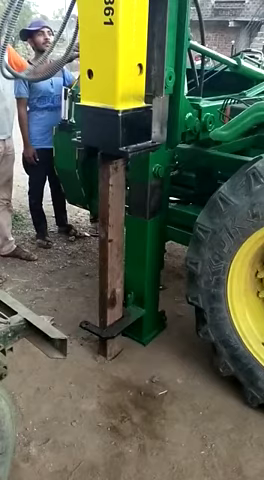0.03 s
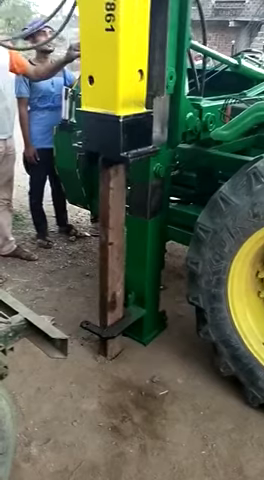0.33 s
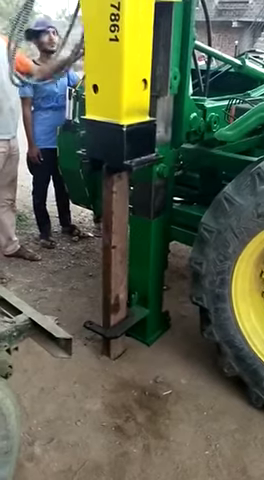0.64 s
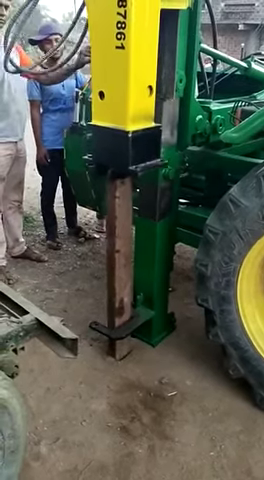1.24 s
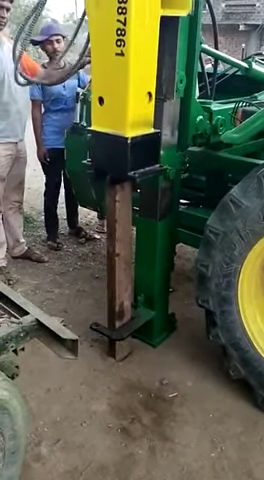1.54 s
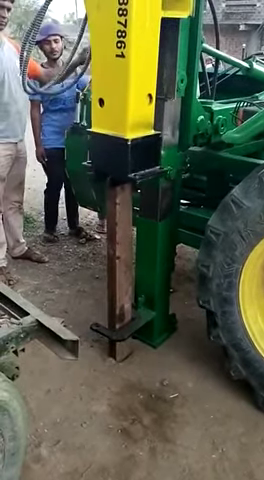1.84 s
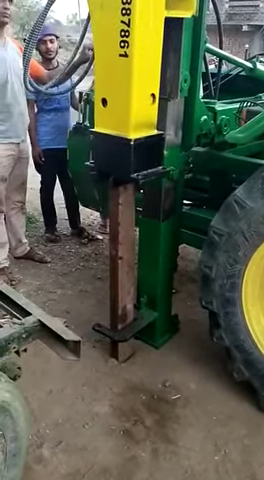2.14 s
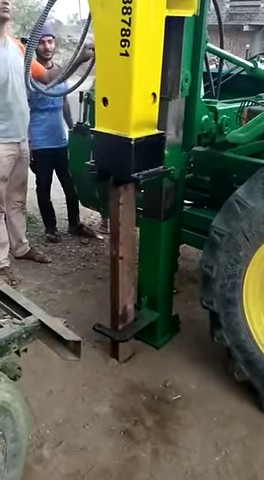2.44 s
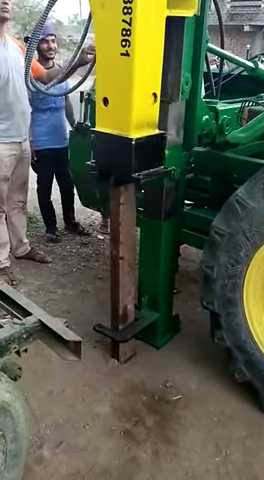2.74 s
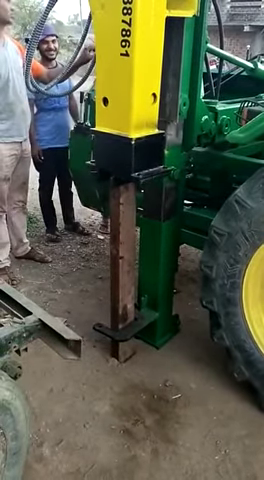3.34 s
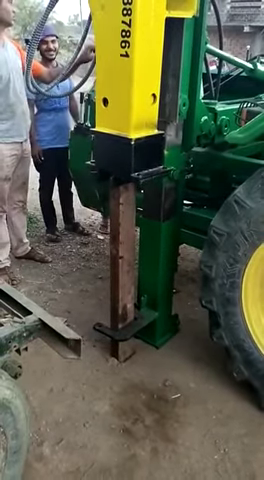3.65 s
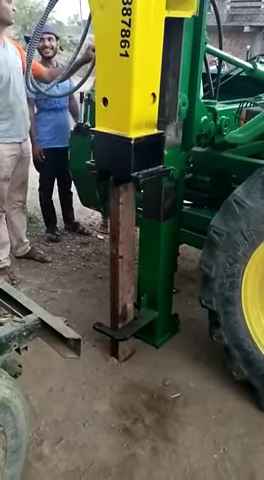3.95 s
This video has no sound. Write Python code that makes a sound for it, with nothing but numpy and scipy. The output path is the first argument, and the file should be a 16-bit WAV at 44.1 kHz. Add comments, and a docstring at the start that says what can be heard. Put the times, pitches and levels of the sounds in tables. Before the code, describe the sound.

A hydraulic hammer clangs on a steel post outdoors, cutting in mid-ring at 0.4 seconds and striking at 0.5. After a pause, four quick ringing blows land between 1.1 and 1.7 seconds, each followed by a metallic rattle. A quieter diesel tractor rumbles underneath and continues until 4 seconds, with a short hydraulic hiss and clatter near 2.6 seconds, then light knocking.

```python
"""An open yard, where a tractor-mounted hydraulic hammer drives a steel post: a short burst, a pause,
four more blows. Each impact gives a broadband crack and excites the post's damped modes; the hammer then
rattles back onto it. The three-cylinder diesel runs throughout, sounding harmonics of its shaft rate and
knocking and hissing more when the hydraulics load it. A limiter lowers the gain at every blow."""
import sys
import numpy as np
from scipy import signal
from scipy.fft import rfft, irfft
from scipy.io import wavfile
from scipy.ndimage import uniform_filter1d, minimum_filter1d

SR = 44100
rng = np.random.default_rng(int(sys.argv[2]) if len(sys.argv) > 2 else 0)


def int16_out(signal):
    """Quantize to a 16-bit WAV file."""
    q = np.round(np.clip(np.atleast_2d(signal).T, -1, 1) * 32767)
    wavfile.write(sys.argv[1], SR, q.astype(np.int16))


N = 176400
T = np.arange(N) / SR

# Left-right coherence (f/Hz, correlation) and balance (f/Hz, left minus right/dB)
COHERENCE = [(100, 0.63), (250, 1.05), (500, 0.72), (1000, 0.46), (2000, 0.1), (4000, -0.31), (12000, 0.2)]
BALANCE = [(110, -1), (380, 4), (700, -2.5), (1290, 6.5), (2380, -1), (4400, 3), (8100, 6.5), (15000, -2)]

# Engine firing rate (t/s, f/Hz)
FIRING_RATE = [(.6, 32.6), (1.1, 32.6), (1.9, 34.3), (2.5, 34.0), (2.9, 33.2), (3.1, 32.3), (3.35, 32.6),
               (3.6, 34.3), (4, 34.2)]
# Engine in the pause, as the valve closes, and after (t/s, exhaust/dB, knock/dB, oil/dB, treble/dB)
ENGINE_PAUSE = [(0.8, -29.5, -24.5, -32, -55.5), (1.1, -32.5, -36, -31.5, -50.5)]
ENGINE_EASED = [(1.95, -32, -30, -45.5, -58)]
ENGINE_AFTER = [(2.101, -32, -39, -47.5, -59.5), (2.268, -32.5, -37.5, -48.5, -60),
                (2.586, -31, -36, -42.5, -52), (2.65, -30, -27, -37, -52), (2.72, -29.5, -33.5, -37.5, -48),
                (2.872, -30, -28, -40, -47.5), (3.026, -29.5, -24.5, -39, -52.5),
                (3.412, -32, -26, -37.5, -50), (3.67, -33, -34.5, -41.5, -50),
                (3.84, -32.5, -31.5, -41.5, -49.5), (4.0, -33, -54, -42.5, -48.5)]
# Exhaust harmonics (multiple of the shaft rate, level/dB)
EXHAUST_ORDERS = [(1, -40), (2, -32), (3, -15), (4, -56), (5, -9.5), (6, 0.5), (7, -6.5), (8, -5.5),
                  (9, -7), (10, -14.5), (11, -13.5), (12, -13), (13, -23.5), (15, -11.5)]
# Envelopes of the exhaust's deep bass and the loaded pump's hum (t/s, level/dB)
BASS_GAIN = [(.4, 1), (2.0, -1), (3.0, 1.5), (3.4, 2.5), (3.6, -8), (4, -12)]
PUMP_LEVEL = [(2.5, -56), (3.1, -35.5), (3.45, -35), (3.56, -60)]
# Relative spectral densities of the exhaust and oil noises (f/Hz, level/dB)
RUMBLE_SPECTRUM = [(20, -24), (50, -12), (85, -12), (120, 4), (180, 2.5), (260, 0), (340, -7), (450, -40),
                   (800, -54.5)]
HISS_SPECTRUM = [(200, -11.5), (450, 6), (640, 3), (830, 7), (1100, 5), (1800, 5), (2150, -2), (2550, -1.5),
                 (3000, -4), (4000, -9), (5200, -17.5), (9000, -86)]
GRIT_SPECTRUM = [(1200, -22), (2200, 4), (2600, -4), (3200, 2), (3700, -0.5), (4400, -22), (6000, -13),
                 (10000, -54)]
TREBLE_SPECTRUM = [(2500, -27), (4500, 0.5), (6000, 0.5), (8000, 4), (9800, -6), (11500, -12.5),
                   (15000, -22)]
VALVE_SPECTRUM = [(300, -25), (800, -2), (1400, 6), (3200, 0), (4500, -11), (6000, -31), (10000, -55)]
# Engine block resonances, one list per column (f/Hz, bandwidth/Hz, level/dB)
BLOCK_HZ = [830, 1390, 1562, 2400, 2580, 2890]
BLOCK_WIDTH_HZ = [82, 74, 79, 70, 89.5, 80]
BLOCK_DB = [-9.5, -3, -2.5, -10.5, -13, -28]
# Knock of each cylinder (level/dB, f/Hz, rise/s)
CYLINDERS = [(1.5, 1562, 0.0065), (-0.5, 1390, 0.0031), (0, 1390, .004)]
# A loose part striking the block (t/s, level/dB, f/Hz)
CLANKS = [(0.854, -20, 1390), (.882, -20, 1380), (2.674, -24, 1460), (2.972, -27, 1500),
          (3.129, -21.5, 1490), (3.22, -20, 1390), (3.314, -19.5, 1500), (3.405, -24, 1440),
          (3.761, -23.5, 1450), (3.854, -26, 1390)]
# Impacts in the valve linkage (t/s, level/dB)
LINKAGE_HITS = [(2.623, -33), (2.641, -25.5), (2.650, -26), (2.673, -32), (2.707, -34)]

# Modes of the post, one list per column (f/Hz, level/dB, T60/s)
POST_HZ = [376, 528, 577, 737, 821, 1324, 2103, 2381, 2448, 2815, 4803, 4880, 5195, 6202, 6471, 6735, 6982,
           7405, 8570, 9383, 10600, 11180, 11480, 14500, 15150]
POST_DB = [-4, 0, -7, -2.5, 0, -1.5, -2.5, 0, 3.5, -10, -8, -14, -12, -25, -6, -11, -13.5, -5, -12, -23,
           -36, -29, -33, -31, -37]
POST_T60 = [0.42, 0.42, 0.38, 0.38, 0.28, 0.27, 0.32, 0.38, 0.38, 0.33, 0.55, .5, 0.45, 1.25, 0.5, 0.41,
            0.36, 0.33, 0.32, 0.68, .22, .35, .22, .42, .33]
# Its two least damped, singing modes (f/Hz)
SINGING_HZ = [6202, 9383]
# Relative spectral densities of the struck post and housing (f/Hz, level/dB)
CLANG_SPECTRUM = [(100, -30), (350, -4.5), (600, -12.5), (1300, 1), (1750, -3), (2300, 2), (3000, -1.5),
                  (4300, -9), (5800, -14), (7300, -11.5), (9100, -15.5), (9900, -40), (11200, -23),
                  (15000, -32)]
RATTLE_SPECTRUM = [(100, -54), (300, -1.5), (550, 5.5), (900, 5), (1400, 4.5), (1800, 1.5), (2400, 0.5),
                   (3500, -10), (7000, -14), (9000, -53), (10000, -66), (15000, -67)]
THUD_SPECTRUM = [(150, -26), (340, -0.5), (450, -11), (560, 1), (780, -4), (1100, -17), (3000, -50),
                 (10000, -80)]
CRACK_SPECTRUM = [(100, -18), (350, -1), (800, -3), (1300, 7), (1700, 1.5), (2100, 4.5), (2800, -12),
                  (4400, -7.5), (5000, -13), (6000, -36), (9000, -46), (15000, -47)]
# Decay of the dense modes (f/Hz, T60/s)
CLANG_T60 = [(200, 0.39), (1000, 0.6), (2500, 0.27), (5000, 0.4), (9000, 0.31), (10500, 0.19), (14000, 0.2)]
# The hammer settling on the post (t/s, level/dB, duration/s, relative thud level/dB)
RATTLES = [(0.396, 0.5, 0.043, -11), (0.58, 1.5, 0.054, -11.5), (1.227, 3.5, 0.012, 0),
           (1.246, -3, 0.067, -10), (1.399, 0, 0.041, -5.5), (1.55, 2, 0.049, -2.5),
           (1.726, 0.5, 0.056, -9)]
# Blows (t/s, level/dB, singing-mode gain/dB); the first is heard only by its decay
BLOWS = [(0.321, 0, 0), (0.4826, -2.5, -20), (1.137, -6.5, -6), (1.2977, -5.5, -3), (1.461, -5, 6),
         (1.6292, -5, 8)]

IMPACT_RISE_S, MODE_SPREAD_DB = .0018, 2.5


def amp(db):
    """Amplitude ratio of a level in decibels."""
    return 10 ** (np.asarray(db) / 20)


def unit(x):
    """Normalisation to unit rms."""
    return x / np.sqrt(np.mean(x ** 2) + 1e-20)


def read(points, hz):
    """Interpolation on a logarithmic frequency axis."""
    f, value = np.transpose(points)
    return np.interp(np.log(hz + 1), np.log(f + 1), value)


def add(mix, s, sound):
    """Superposition of a stereo sound starting at time s."""
    part = mix[:, max(round(s * SR), 0):][:, :sound.shape[1]]
    part += sound[:, :part.shape[1]]


def noise(spectrum, size=N, coherence=None):
    """Spectrally shaped Gaussian noise, partially coherent between the channels."""
    hz = np.fft.rfftfreq(size, 1 / SR)
    a, b = rfft(rng.standard_normal((2, size)))
    c = np.clip(read(COHERENCE, hz) if coherence is None else coherence, -1, 1)
    gain = spectrum(hz) if callable(spectrum) else amp(read(spectrum, hz))
    return unit(irfft(np.array([a, c * a + np.sqrt(1 - c ** 2) * b]) * gain, size))


def wander(bandwidth_hz):
    """Low-pass random modulation of unit rms."""
    hz = np.fft.rfftfreq(N, 1 / SR)
    return unit(irfft(rfft(rng.standard_normal(N)) * np.exp(-(hz / bandwidth_hz) ** 2), N))


def phases(hz, likeness=6):
    """Random modal phases in cycles; the channels diverge as coherence falls."""
    count = np.size(hz)
    return rng.random(count) + rng.standard_normal((2, count)) * (1 - read(COHERENCE, hz)) / likeness


def exhaust(firings, shaft, gain):
    """Periodic gas pulses: shaft harmonics and rumble, amplitude-modulated at the firing rate."""
    throb = np.cos(2 * np.pi * (firings - .57))  # peaks .57 of a period after each firing
    tones = sum(amp(db + wander(17)) * np.sin(2 * np.pi * (order * shaft + rng.random()))
                for order, db in EXHAUST_ORDERS)
    rumble = noise(RUMBLE_SPECTRUM) * (1 + .38 * throb)
    out = gain * (amp(-2.5) * unit(tones * (1 + .14 * throb)) + amp(-4.5) * unit(rumble))
    bass = signal.sosfiltfilt(signal.butter(6, 142, fs=SR, output="sos"), out, padtype="even")
    return out + bass * (amp(np.interp(T, *np.transpose(BASS_GAIN))) - 1)


def block_response(hz):
    """Resonance of the engine block: a sum of Lorentzian peaks."""
    return sum(amp(db) / (1 + (2 * (hz - centre) / width) ** 2)
               for centre, width, db in zip(BLOCK_HZ, BLOCK_WIDTH_HZ, BLOCK_DB))


def hydraulics(shaft, oil_gain, treble_gain):
    """Flow noise: oil under pressure hisses and crackles over the pump's hum at shaft order 12."""
    hum = amp(np.interp(T, *np.transpose(PUMP_LEVEL))) * np.sin(2 * np.pi * 12 * shaft)
    flow = unit(amp(wander(40)))
    hiss = amp(5) * noise(HISS_SPECTRUM) + noise(block_response)
    grit = amp(-5.5) * unit(noise(GRIT_SPECTRUM) * amp(4.5 * wander(220)))
    treble = amp(-1.5) * noise(TREBLE_SPECTRUM)
    return hum + oil_gain * (flow * hiss + grit) + treble_gain * flow * treble


def knock(focus_hz, rise_s):
    """Impact response of the block: damped modes, favoured within 170 Hz of the focus."""
    t, hz = T[:SR // 10], np.array(BLOCK_HZ)
    away = np.minimum(abs(hz - focus_hz) / 170, 1)
    levels = amp(np.array(BLOCK_DB) - 7 * away + MODE_SPREAD_DB * rng.standard_normal(len(hz)))
    pitches = hz + 22.2 * rng.standard_normal(len(hz))
    modes = np.sin(2 * np.pi * (pitches[:, None] * t + phases(hz)[:, :, None]))
    envelope = t / rise_s * np.exp(1 - t / rise_s)
    return (levels / np.linalg.norm(levels)) @ modes * envelope


def diesel_knock(firings, gain):
    """Impulsive excitation of the block by each firing and, now and then, by a loose part."""
    out, count = np.zeros((2, N)), np.floor(firings).astype(int)
    for at in np.flatnonzero(np.diff(count)) + 1:
        db, hz, rise_s = CYLINDERS[count[at] % len(CYLINDERS)]
        add(out, T[at], gain[at] * amp(db) * knock(hz, rise_s))
    for s, db, hz in CLANKS:
        add(out, s, amp(db) * knock(hz, rise_s=.002))
    return out


def valve():
    """Flow transient: oil rushes through the opening valve and the linkage clatters under load."""
    open_s, rise_s, fall_s = 2.615, .03, .06
    rush = np.clip((T - open_s) / rise_s, 0, 1) ** 2 * np.exp(-np.maximum(T - open_s - rise_s, 0) / fall_s)
    out = amp(-37) * rush * noise(VALVE_SPECTRUM)
    t = T[:SR // 10]
    tap = np.minimum(t / .001, 1) * np.exp(-t / .0077)
    for s, db in LINKAGE_HITS:
        add(out, s, amp(db) * tap * noise(VALVE_SPECTRUM, len(t)))
    return out


def panels(x, ripple_db=3, width_hz=45):
    """Narrow resonances of sheet-metal panels ripple the spectrum above 500 Hz."""
    hz = np.fft.rfftfreq(N, 1 / SR)
    ripple = unit(uniform_filter1d(rng.standard_normal((2, len(hz))), size=int(width_hz * N / SR)))
    return irfft(rfft(x) * amp(ripple_db * ripple * np.clip(hz / 1000 - .5, 0, 1)), N)


def tractor():
    """The four-stroke cycle locks exhaust, knock and pump: each cylinder fires once in two turns."""
    times, *levels = np.vstack([ENGINE_PAUSE, ENGINE_EASED, ENGINE_AFTER]).T
    exhaust_gain, knock_gain, oil_gain, treble_gain = [amp(np.interp(T, times, db)) for db in levels]
    firings = np.cumsum(np.interp(T, *np.transpose(FIRING_RATE))) / SR
    firings -= np.interp(2.019, T, firings)  # the loudest cylinder fires at 2.019 s
    shaft = firings * 2 / len(CYLINDERS)
    running = exhaust(firings, shaft, exhaust_gain) + hydraulics(shaft, oil_gain, treble_gain)
    return panels(running + diesel_knock(firings, knock_gain) + valve())


def clang():
    """High modal density: many weak modes of post and housing merge, with frequency-dependent decay."""
    pitches = rng.uniform(250, 10000, size=420)
    turns = phases(pitches, likeness=5)
    lines = np.zeros((2, SR // 2 + 1), complex)
    lines[:, pitches.astype(int)] = amp(read(CLANG_SPECTRUM, pitches)) * np.exp(2j * np.pi * turns)
    steady = unit(unit(irfft(lines)) + .68 * noise(CLANG_SPECTRUM, SR))
    hz, t, frames = signal.stft(steady, SR, nperseg=256)
    decay = amp(-60 * t / read(CLANG_T60, hz)[:, None])
    return signal.istft(frames * decay, SR, nperseg=256)[1][:, :SR]


def post_ring(dense_modes, singing_db):
    """Free vibration of the post; shaking in its guide modulates the phases, the singing modes least."""
    t, out, shake = T[:SR], amp(-1) * dense_modes, wander(35)
    for hz, db, t60 in zip(POST_HZ, POST_DB, POST_T60):
        sings, at = hz in SINGING_HZ, rng.integers(N - SR)
        offset_db = singing_db if sings else MODE_SPREAD_DB * rng.standard_normal((2, 1))
        envelope = amp(db - 8.5 + offset_db - 60 * t / t60)
        turns = phases(hz)
        detune_hz = 7 * rng.standard_normal()
        waver = (.15 * shake[at:at + SR] + detune_hz * t) * (.35 if sings else 1)
        out = out + envelope * np.sin(2 * np.pi * (hz * t + turns + waver))
    return out * np.minimum(t / IMPACT_RISE_S, 1)


def housing_rattle(dense_modes, knocks_per_s=220, t60=.17):
    """Contact chatter: the housing drops onto the post, a random impulse train exciting both."""
    out, t = np.zeros((2, N)), T[:SR]
    fade = amp(-60 * t / t60) * np.minimum(t / IMPACT_RISE_S, 1)
    body, thud = unit(noise(RATTLE_SPECTRUM, SR) * fade), unit(noise(THUD_SPECTRUM, SR) * fade)
    for s, db, length, thud_db in RATTLES:
        contacts = rng.random(SR) < knocks_per_s / SR
        knocks = contacts * rng.choice([-1., 1.], SR) * rng.uniform(.35, 1, SR)
        knocks[0] = 1.92  # the first contact is the hardest
        knocks *= np.exp(-(t / length) ** 2 / 2)
        response = body + amp(-6.5) * unit(post_ring(dense_modes, singing_db=-20)) + amp(thud_db) * thud
        chatter = signal.fftconvolve(response, knocks[None], axes=1)
        chatter *= np.sqrt(4 * length * SR / np.sum(chatter ** 2))  # energy proportional to duration
        add(out, s, amp(db - 17) * chatter)
    return out


def valve_spit(width_s):
    """A Gaussian pulse of flow noise, centred three widths after its start."""
    t = T[:SR // 4]
    return noise(CLANG_SPECTRUM, len(t)) * np.exp(-(t / width_s - 3) ** 2 / 2)


def hammer(dense_modes, alike=.7, spit_lead_s=.011, spit_width_s=.0028):
    """Impact excitation: the valve spits, the piston lands with a broadband crack, the steel rings."""
    out, t = np.zeros((2, N)), T[:SR // 10]
    envelope = np.minimum(t / IMPACT_RISE_S, 1) * np.exp(-np.maximum(t - .0025, 0) / .0035)
    shared = noise(CRACK_SPECTRUM, len(t), coherence=.71)
    for s, db, singing_db in BLOWS:
        fresh = noise(CRACK_SPECTRUM, len(t), coherence=.71)
        crack = np.sqrt(alike) * shared + np.sqrt(1 - alike) * fresh
        add(out, s, amp(db + 12) * envelope * crack)
        add(out, s, amp(db) * post_ring(dense_modes, singing_db))
        add(out, s - spit_lead_s - 3 * spit_width_s, amp(-22.5) * valve_spit(spit_width_s))
    return out


def scene(left_lag_s=.00004):
    """Superposition of hammer and tractor, with time and level differences between the channels."""
    hz, dense_modes = np.fft.rfftfreq(N, 1 / SR), clang()
    mix = hammer(dense_modes) + housing_rattle(dense_modes) + tractor()
    lean_db = read(BALANCE, hz) / 2
    channels = np.array([amp(lean_db) * np.exp(-2j * np.pi * hz * left_lag_s), amp(-lean_db)])
    return irfft(rfft(mix) * channels, N)


def record(dry):
    """Look-ahead limiting, soft saturation and band limiting; the sound cuts in mid-ring."""
    threshold_db, slope, hold_s, lookahead_s = -18, .48, .066, .0075
    ceiling, start_s = .76, .387
    power_db = 10 * np.log10(abs(uniform_filter1d((dry ** 2).mean(0), size=160)) + 1e-12)
    excess_db = np.maximum(power_db - threshold_db, 0)
    hold = 2 * int(hold_s * SR / 2) + 1
    held_db = -minimum_filter1d(-excess_db, hold, origin=hold // 2)
    fall_db = 185 * T  # the held excess decays linearly in decibels
    smooth_db = uniform_filter1d(np.maximum.accumulate(held_db + fall_db) - fall_db, size=80)
    ducked = dry * amp(-slope * np.interp(T + lookahead_s, T, smooth_db))
    saturated = ducked / (1 + (ducked / ceiling) ** 4) ** (1 / 4)
    highpassed = signal.sosfilt(signal.butter(4, 48, "highpass", fs=SR, output="sos"), saturated)
    gate = np.clip((T - start_s) / .002, 0, 1)
    lowpass = signal.firwin(511, 15700, window=("kaiser", 9), fs=SR)
    return signal.oaconvolve(highpassed * gate, lowpass[None], "same")


dry = scene()
out = record(dry)
int16_out(out)
```